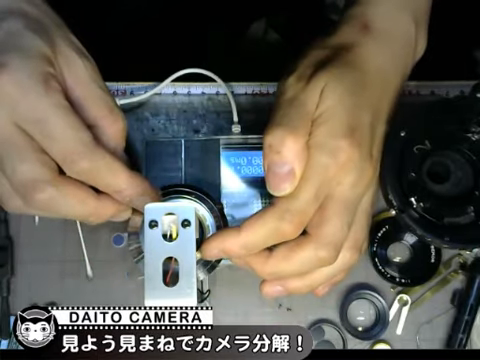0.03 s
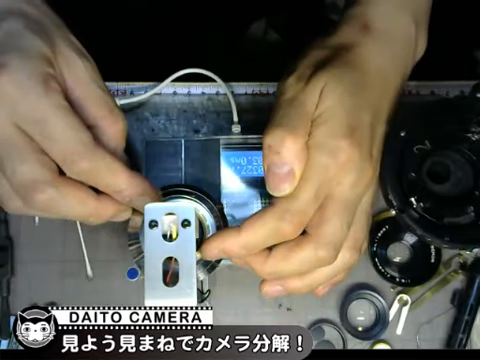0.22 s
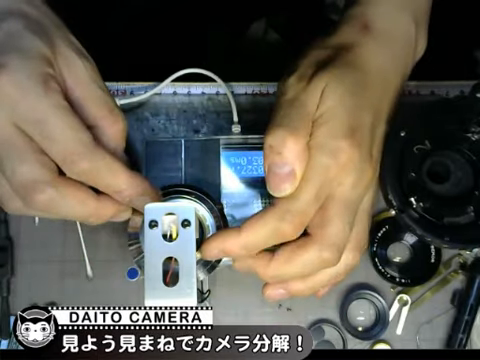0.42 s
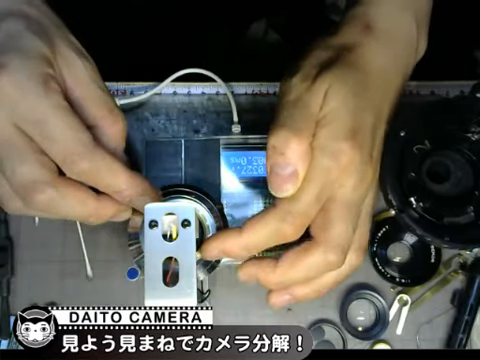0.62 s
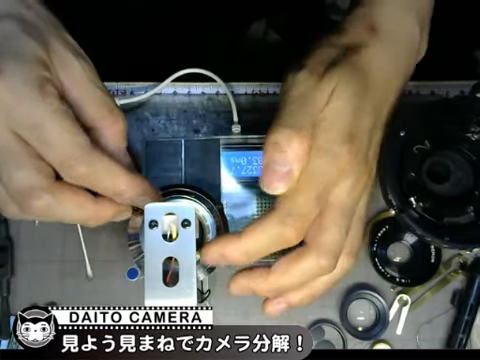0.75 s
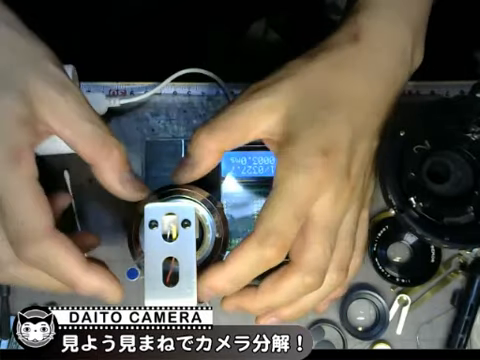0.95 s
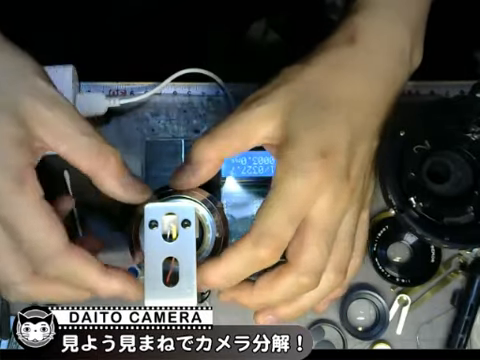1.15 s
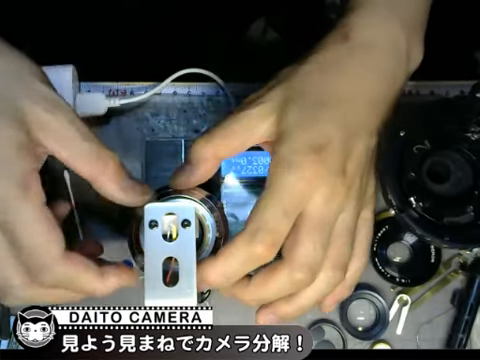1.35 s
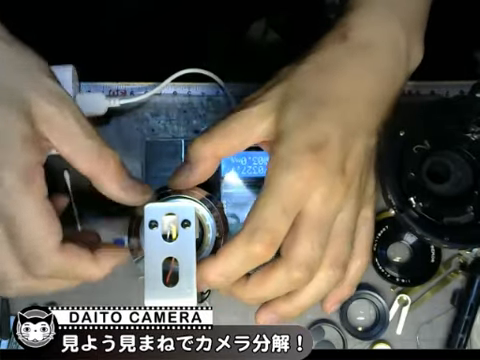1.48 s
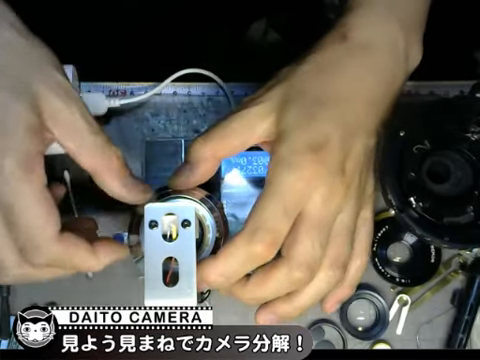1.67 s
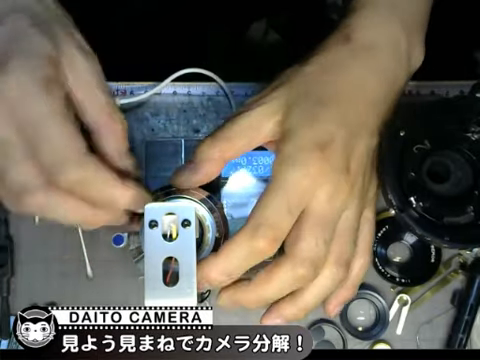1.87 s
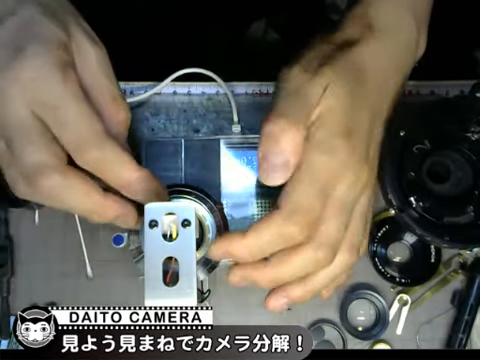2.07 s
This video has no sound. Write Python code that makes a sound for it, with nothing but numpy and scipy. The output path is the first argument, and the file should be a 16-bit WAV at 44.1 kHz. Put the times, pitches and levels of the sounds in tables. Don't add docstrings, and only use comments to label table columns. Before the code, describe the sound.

A camera leaf shutter fires at about 0.2 s: one hard, dry metallic clack, a tight burst of impacts lasting some 30 ms, slightly distorted, with a short bench echo. Very faint finger ticks follow at 0.6, 1.1 and 1.4 s. From 1.5 to 1.65 s a lever scrapes and clicks into place, then light taps until 2.05 s. Quiet room, soft low ventilation hum, close dull microphone.

```python
import sys
import numpy as np
from scipy import signal
from scipy.fft import rfft, irfft
from scipy.io import wavfile
from scipy.ndimage import uniform_filter1d

SR = 44100
rng = np.random.default_rng(int(sys.argv[2]) if len(sys.argv) > 2 else 0)


def linear_from_db(decibels):
    return 10 ** (np.asarray(decibels, float) / 20)


def dump(signal):
    limited = np.clip(np.atleast_2d(signal).T, -1, 1)
    pcm = np.round(limited * 32767).astype(np.int16)
    wavfile.write(sys.argv[1], SR, pcm)


N = 92610
T = np.arange(N) / SR

# [t/s, level/dB, chatter/s, barrel thud/dB]
SHUTTER_IMPACTS = [
    (.2101, -11, 0.01, -24),
    (.2133, -17.5, 0.0019, -21),
    (.2154, 4, .003, -16.5),
    (.2172, 7, 0.0039, -30),
    (.2205, -3, .002, -5),
    (.2228, -2.5, 0.0018, -20.5),
    (.2270, -9.5, 0.0011, -20),
    (.2290, -17.5, .002, -19.5),
    (.2370, -20.5, 0.0014, -17),
]
# [f/Hz, level/dB, T60/s]
MECHANISM_MODES = [(1422, -14, 0.094), (1663, -9.5, 0.2), (1906, 0, 0.028), (2207, 4, 0.054),
                   (2439, -5.5, 0.082), (2660, 12, 0.13), (2797, -1.5, 0.43), (3192, -6.5, 0.16),
                   (3920, -5.5, 0.077), (4118, -20, 0.16), (5284, -11.5, 0.12), (6140, -12, 0.18),
                   (7158, -11, 0.096)]
# [f/Hz, level/dB, T60/s]
BARREL_MODES = [(308, -5.5, 0.039), (519, -4, 0.065), (676, -3, .05), (1060, -9.5, .015), (1390, -15, .02)]
# [t/s, level/dB, ring f/Hz, bright click/dB, thud/dB]
FINGER_TICKS = [(.6105, -46, 2400, -16, -22), (.6290, -52, 2297, -18, -20), (.6442, -38.5, 1986, 1.5, -20),
                (.6450, -40.5, 3700, -6, -20), (.6470, -37.5, 2800, -6.5, -15),
                (1.0728, -45, 3366, -18, -2.5), (1.0745, -42, 1428, -20, -15), (1.1165, -49, 2300, -18, 7),
                (1.2146, -43.5, 2492, -12, -17), (1.3812, -30, 1930, -12.5, -28),
                (1.3812, -31.5, 3190, -14, -12), (1.3815, -45, 1399, -26, -20),
                (1.4153, -49.5, 2010, -10, -11), (1.7622, -43.5, 2834, -1, -3),
                (1.8062, -32, 1960, -26, -28), (1.8062, -38, 3210, -16, -24),
                (1.9200, -49.5, 1728, -20, -17), (2.0410, -42.5, 2602, -25, -10),
                (2.0437, -37.5, 2080, -28, -8), (2.0440, -41, 2603, -23, -25),
                (2.0445, -45, 3700, -22, -22)]
# [t/s, level/dB, ring f/Hz, bright click/dB, thud/dB]
LEVER_CATCHES = [(1.5005, -54.5, 3100, 6, -11), (1.5090, -51.5, 3080, 7.5, 5),
                 (1.5330, -49, 2500, -5, -15.5), (1.5456, -43, 2550, -17, -15),
                 (1.5600, -45, 3260, -13, -18), (1.5752, -41, 3100, -6, -21),
                 (1.5795, -35.5, 3100, -19, -11), (1.5932, -35, 3470, -17, -16),
                 (1.5975, -34, 1880, -2, -18), (1.6032, -27.5, 3700, -19, -13.5),
                 (1.6068, -27.5, 1440, -23, -8.5), (1.6123, -32.5, 3690, -25, -26),
                 (1.6380, -31.5, 3850, 2.5, -17), (1.6404, -29, 2820, -3, -23),
                 (1.6435, -30.5, 3750, -10, -19), (1.6501, -25.5, 2290, -8, -9.5)]
# [t/s, level/dB]
LEVER_FRICTION = [(1.495, -69), (1.503, -65), (1.53, -59), (1.55, -58), (1.575, -53), (1.6, -49),
                  (1.625, -57.5), (1.635, -47), (1.668, -75)]
# [f/Hz, width/Hz, level/dB]
HOUSING_RESONANCES = [(1950, 700, -3), (2750, 530, 3), (3250, 600, 1.5), (3884, 590, -6.5),
                      (5300, 1000, -9.5), (6270, 800, -10.5), (7000, 600, -13)]
# [f/Hz, density/dB]
AIR_SPECTRUM = [(18, -40), (30, -9.5), (97, -9.5), (266, -8), (292, -8), (328, -9), (582, -14.5),
                (700, -15.5), (7300, -37), (9490, -58.5), (16100, -120)]

MECHANISM_DB, CRACK_DB = -11.5, 3.5
MECHANISM_T60_SCALE = 0.17
MODE_SCATTER_DB = 2
BARREL_LOW_HZ = 232
FINGER_CHATTER_S, FINGER_BODY_DB = 0.0051, -6
LEVER_CHATTER_S, LEVER_BODY_DB = 0.0036, 1.5
TICK_T60_S, TICK_LOW_HZ, TICK_GAIN_DB = 0.017, 1300, -1
BRIGHT_HZ, BRIGHT_WIDTH_HZ = 6200, 1500
BENCH_T60_S, BENCH_DB = 0.085, -12
ROOM_T60_S, ROOM_DB = 0.16, -22
ECHO_LOW_HZ = 900
ECHO_DIP_HZ, ECHO_DIP_WIDTH_HZ, ECHO_DIP = 2750, 1400, 0.35
AIR_DB, SWELL_DB, FLICKER_DB = -53, 0.4, 0.8
FAN_HZ, FAN_WIDTH_HZ, FAN_DB = 100, 22, -63.5
MIC_DIP_HZ, MIC_DIP_WIDTH_HZ, MIC_DIP = 4750, 400, 0.35
MIC_TOP_HZ, MIC_CLIP = 7240, 0.86
STAGE_TOP_HZ, STAGE_CLIP, STAGE_OFFSET = 16000, 0.72, 0.0061


def unit(x):
    return x / np.sqrt(np.mean(x ** 2))


def peak(x):
    return x / np.max(np.abs(x))


def high_pass(x, order, hz):
    return signal.sosfilt(signal.butter(order, hz, "high", fs=SR, output="sos"), x)


def band(x, hz, width_hz):
    b, a = signal.iirpeak(hz, hz / width_hz, SR)
    return signal.lfilter(b, a, x)


def walk(rate_hz):
    hold = int(SR / rate_hz)
    steps = np.repeat(rng.standard_normal(N // hold + 1), hold)
    return 1.3 * uniform_filter1d(uniform_filter1d(steps, hold), hold)[:N]


def add(out, t_s, x, db):
    i = int(t_s * SR)
    x = x[:N - i]
    out[i:i + len(x)] += x * linear_from_db(db)


def chatter(t60_s):
    n = np.arange(SR // 8)
    force, unevenness = rng.standard_normal((len(n), 2)).T
    x = force * linear_from_db(5.0 * unevenness) * linear_from_db(-20 * n / SR / t60_s)
    return x / np.sqrt(np.sum(x ** 2))


def ring(x, modes, t60_scale):
    out = 0
    luck = rng.standard_normal((len(modes), 2))
    for (hz, db, t60_s), (strength, sign) in zip(modes, luck):
        pole = np.exp(2j * np.pi * hz / SR - np.log(1000) / (t60_s * t60_scale * SR))
        mode = signal.lfilter([1], [1, -pole], x).imag
        out = out + linear_from_db(db + MODE_SCATTER_DB * strength) * np.sign(sign) * mode
    return out


def housing(x, count=7):
    out = 0
    for k, (hz, width_hz, db) in enumerate(HOUSING_RESONANCES[:count]):
        out = out + (-1) ** k * linear_from_db(db) * band(band(x, hz, width_hz), hz, 2 * width_hz)
    return out


def barrel(contact, t60_scale):
    return peak(high_pass(ring(contact, BARREL_MODES, t60_scale), 2, BARREL_LOW_HZ))


def shutter():
    out = np.zeros(N)
    for t_s, db, chatter_s, thud_db in SHUTTER_IMPACTS:
        contact = chatter(chatter_s)
        metal = linear_from_db(MECHANISM_DB) * peak(ring(contact, MECHANISM_MODES, MECHANISM_T60_SCALE))
        crack = linear_from_db(CRACK_DB) * peak(housing(contact))
        thud = linear_from_db(thud_db) * barrel(contact, 0.93)
        add(out, t_s, metal + crack + thud, db)
    return out


def ticks(table, chatter_s, body_db):
    out = np.zeros(N)
    for t_s, db, hz, bright_db, thud_db in table:
        contact = chatter(chatter_s)
        part = peak(ring(contact, [(hz, 0, TICK_T60_S)], 1))
        body = linear_from_db(body_db) * peak(housing(contact, count=4))
        bright = band(band(contact, BRIGHT_HZ, BRIGHT_WIDTH_HZ), BRIGHT_HZ, BRIGHT_WIDTH_HZ)
        x = high_pass(part + body, 2, TICK_LOW_HZ) + linear_from_db(bright_db) * peak(bright)
        add(out, t_s, x + linear_from_db(thud_db) * barrel(contact, 0.61), db + TICK_GAIN_DB)
    return out


def scrape():
    t_s, db = np.array(LEVER_FRICTION).T
    force, unevenness = rng.standard_normal((N, 2)).T
    friction = force * linear_from_db(3.0 * unevenness + 2.5 * walk(120))
    grains = unit(housing(friction)) + linear_from_db(-7.5) * unit(band(friction, BRIGHT_HZ, BRIGHT_WIDTH_HZ))
    return grains * linear_from_db(np.interp(T, t_s, db, left=-120, right=-120))


def decay(t, t60_s, db, onset_s):
    return linear_from_db(db - 60 * t / t60_s) * (t > onset_s) * np.sqrt(2 * np.log(1000) / (t60_s * SR))


def reverberation(near):
    t = T[:SR // 2]
    envelope = decay(t, BENCH_T60_S, BENCH_DB, 0.0015) + decay(t, ROOM_T60_S, ROOM_DB, 0.008)
    echo = high_pass(rng.standard_normal(len(t)) * envelope, 1, ECHO_LOW_HZ)
    echo = echo - ECHO_DIP * band(echo, ECHO_DIP_HZ, ECHO_DIP_WIDTH_HZ)
    return signal.fftconvolve(near, echo)[:N]


def air():
    hz, db = np.array(AIR_SPECTRUM).T
    f = np.maximum(np.fft.rfftfreq(N, 1 / SR), 1)
    spectrum = rfft(rng.standard_normal(N)) * linear_from_db(np.interp(np.log(f), np.log(hz), db))
    out, swell = 0, walk(4.5)
    for k in range(-1, 18):
        share = np.clip(1 - np.abs(2 * np.log2(f / 30) - k), 0, 1)
        out = out + irfft(spectrum * share, N) * linear_from_db(SWELL_DB * swell + FLICKER_DB * walk(4.2))
    return unit(out) * linear_from_db(AIR_DB)


def fan():
    hum = band(band(rng.standard_normal(N), FAN_HZ, FAN_WIDTH_HZ), FAN_HZ, 2 * FAN_WIDTH_HZ)
    return linear_from_db(FAN_DB) * unit(hum)


def scene():
    near = shutter()
    near = near + ticks(FINGER_TICKS, FINGER_CHATTER_S, FINGER_BODY_DB)
    near = near + ticks(LEVER_CATCHES, LEVER_CHATTER_S, LEVER_BODY_DB) + scrape()
    near = near - MIC_DIP * band(near, MIC_DIP_HZ, MIC_DIP_WIDTH_HZ)
    return (near + reverberation(near) + air() + fan())[None]


def band_limit(x):
    return signal.sosfilt(signal.butter(12, 16590, fs=SR, output="sos"), x)


def record(dry):
    narrow = signal.cheby1(8, 0.3, MIC_TOP_HZ, fs=SR, output="sos")
    overloaded = np.clip(signal.sosfilt(narrow, dry), -MIC_CLIP, MIC_CLIP)
    x = signal.sosfiltfilt(narrow, overloaded)
    shaved = np.clip(x, -STAGE_CLIP, STAGE_CLIP)
    mix = signal.filtfilt(signal.firwin(63, STAGE_TOP_HZ, fs=SR), 1, shaved) + STAGE_OFFSET
    return band_limit(mix)


dry = scene()
out = record(dry)
dump(out)
```